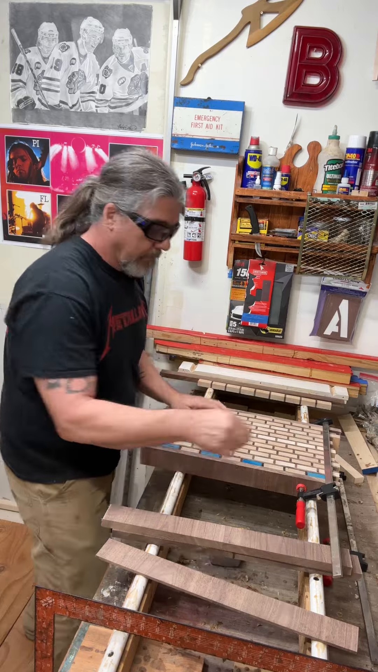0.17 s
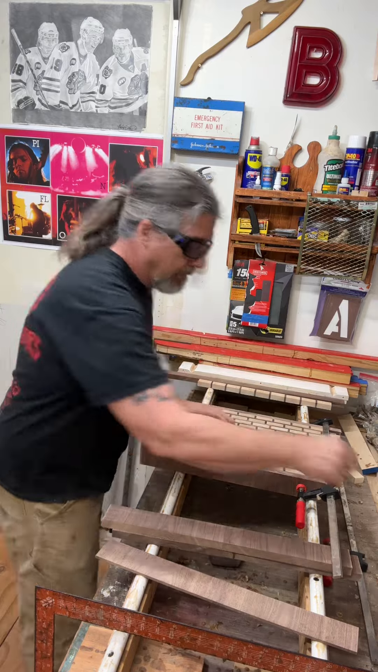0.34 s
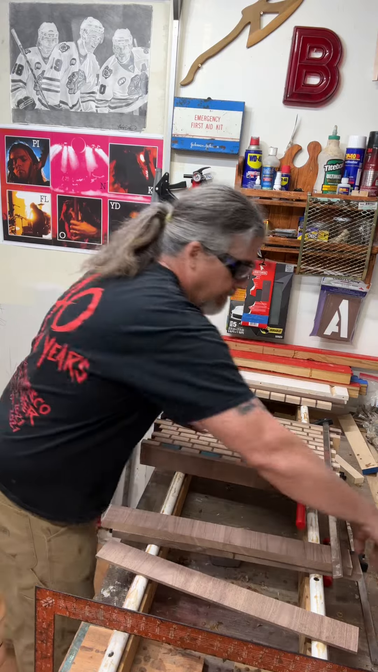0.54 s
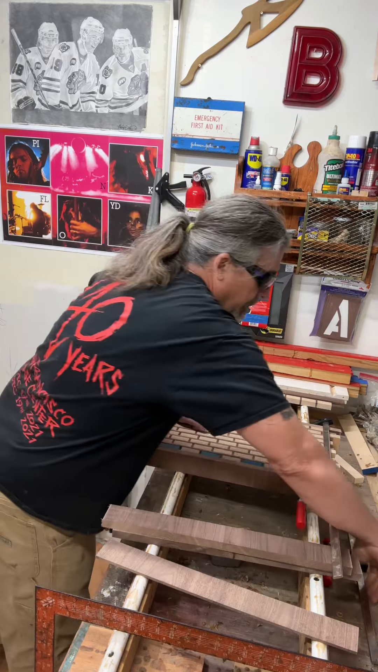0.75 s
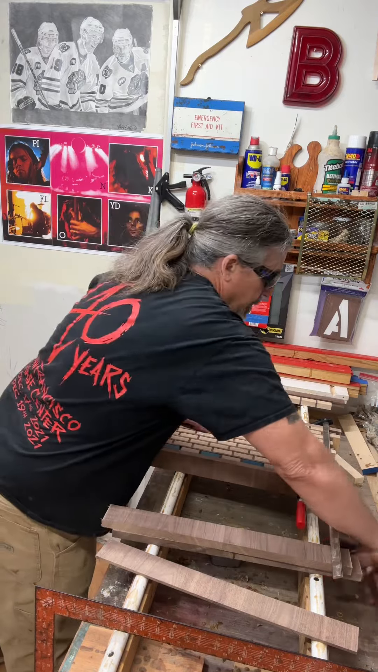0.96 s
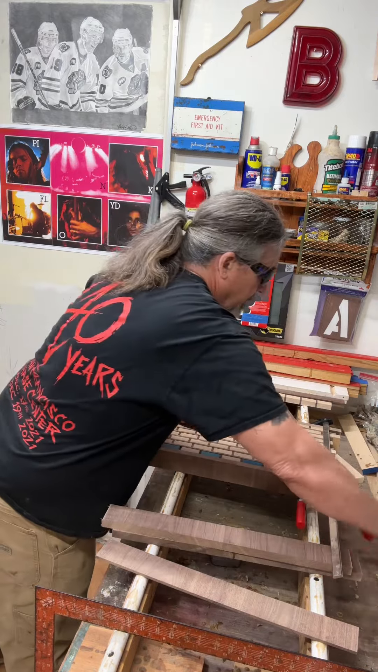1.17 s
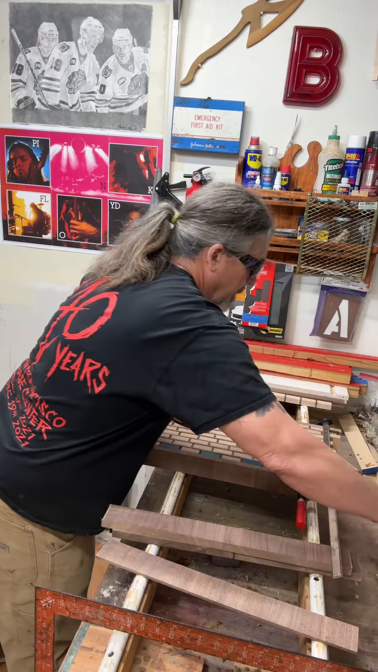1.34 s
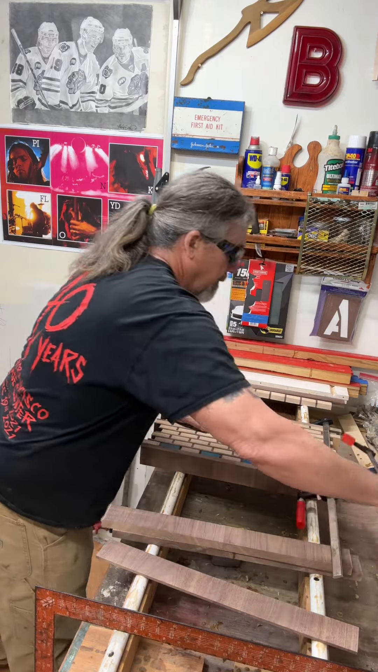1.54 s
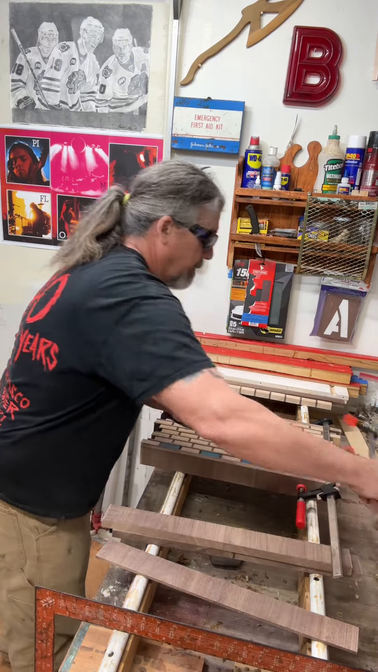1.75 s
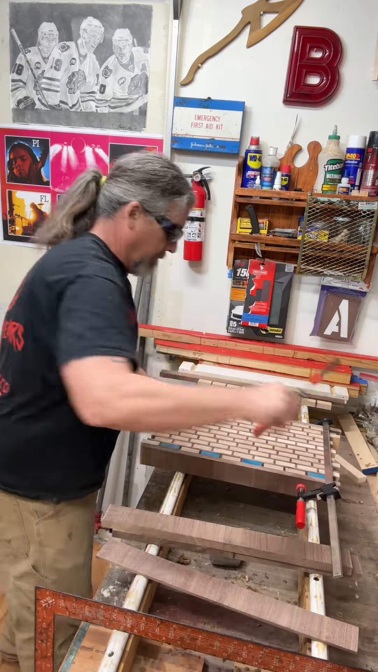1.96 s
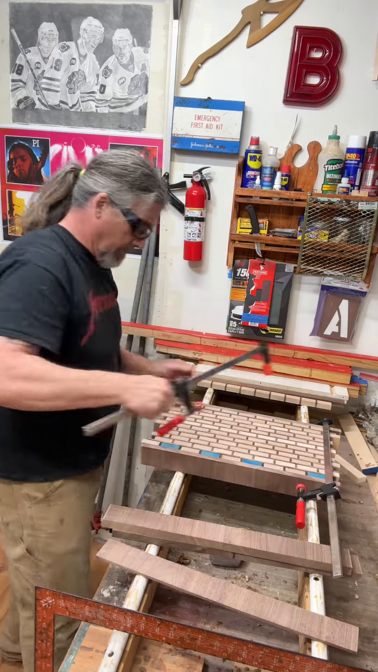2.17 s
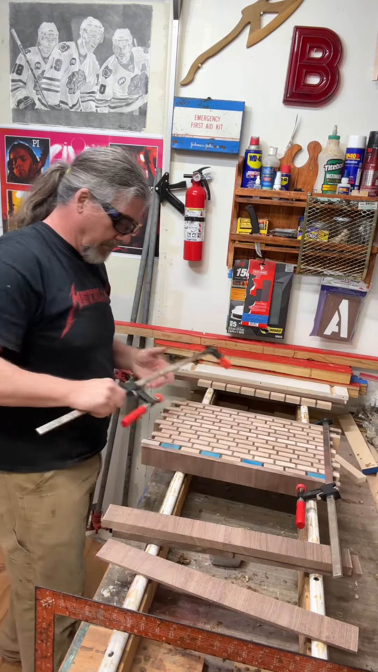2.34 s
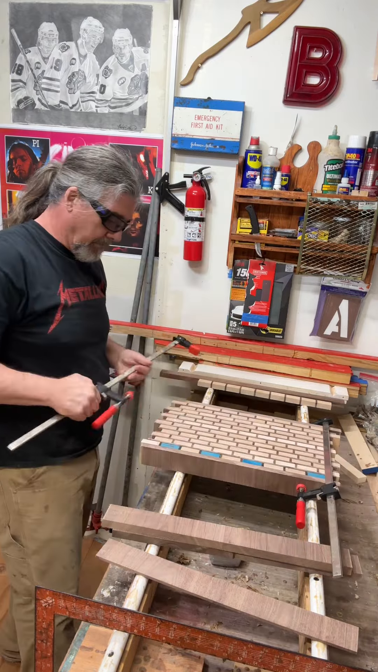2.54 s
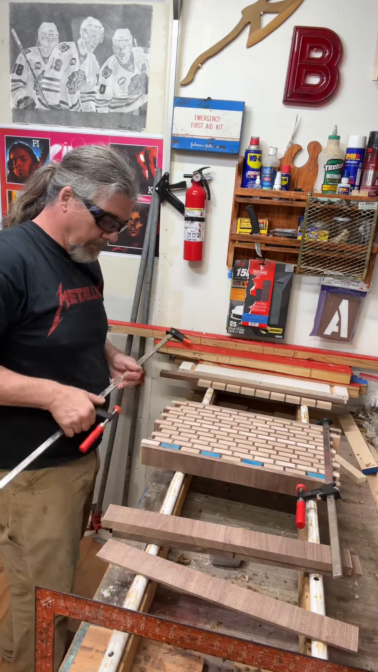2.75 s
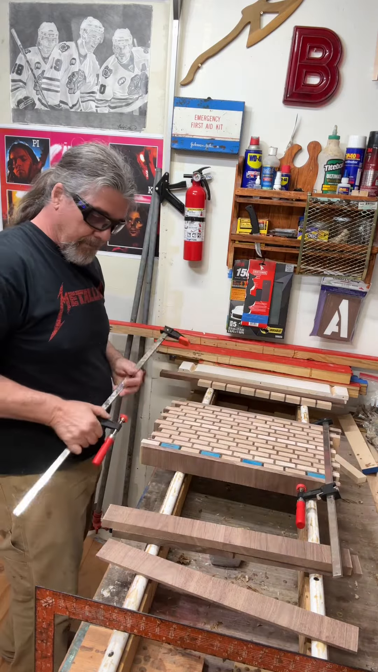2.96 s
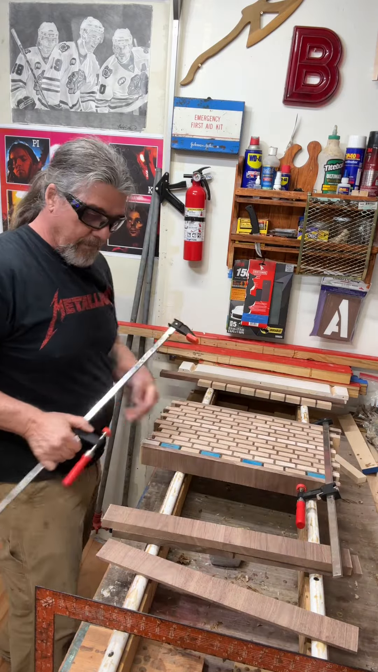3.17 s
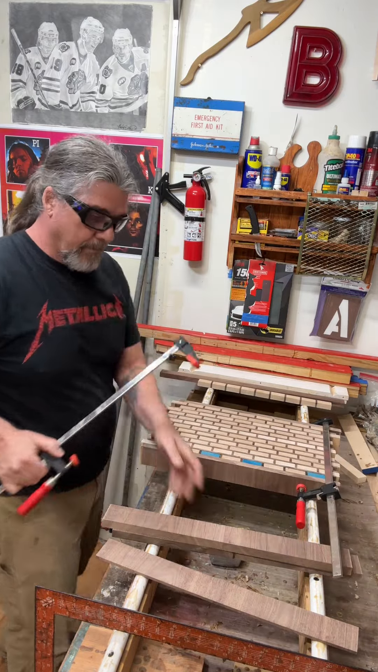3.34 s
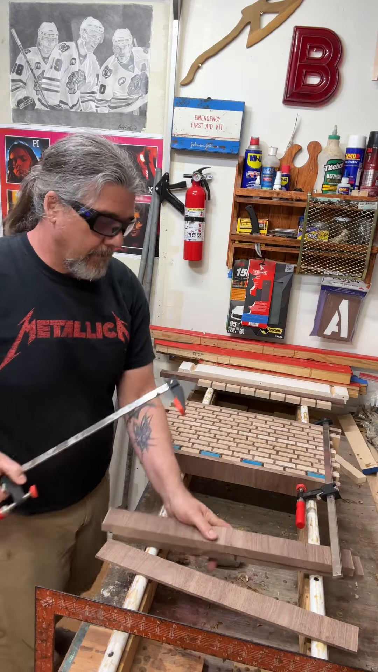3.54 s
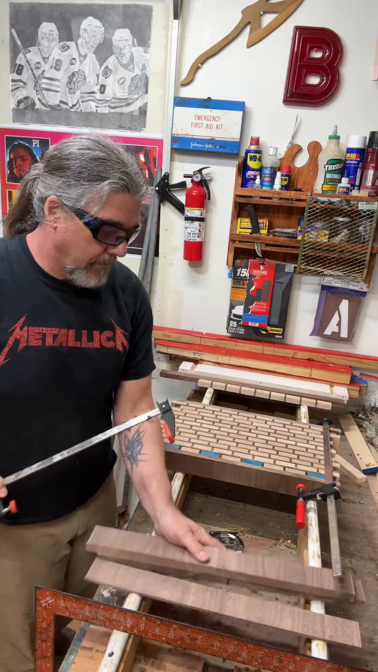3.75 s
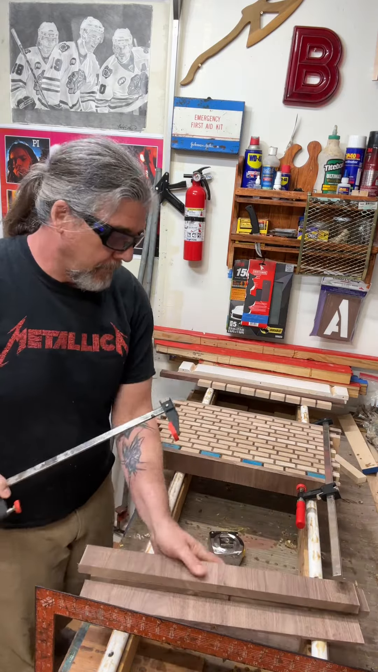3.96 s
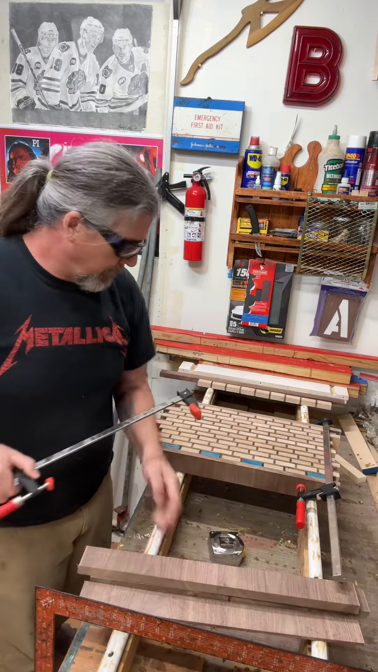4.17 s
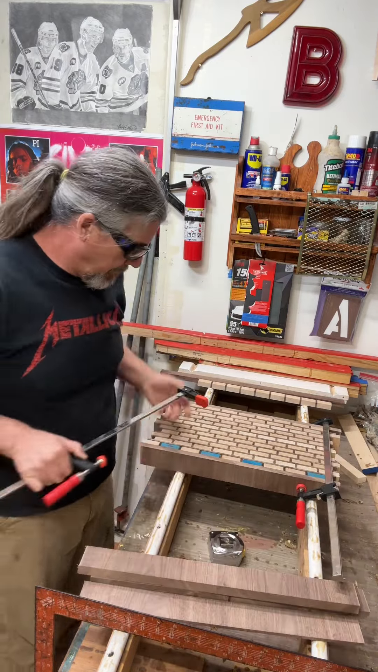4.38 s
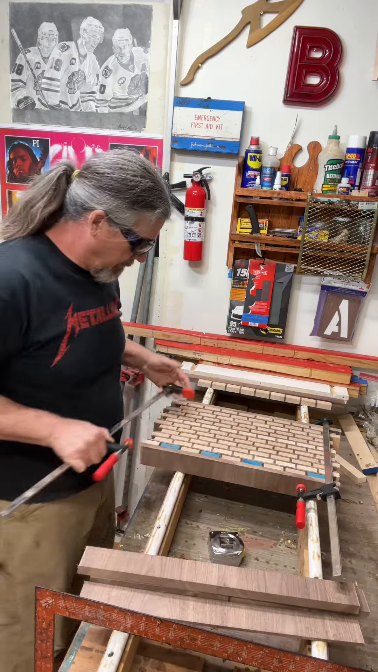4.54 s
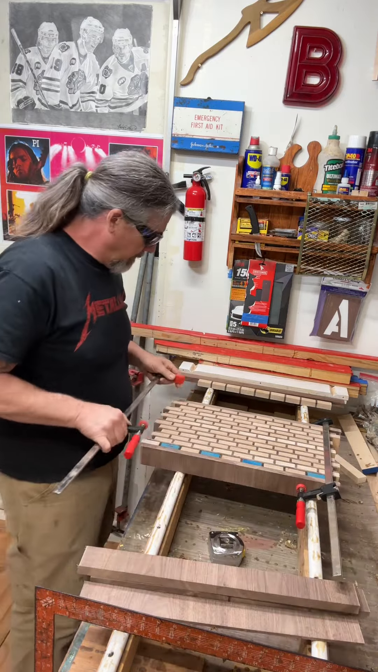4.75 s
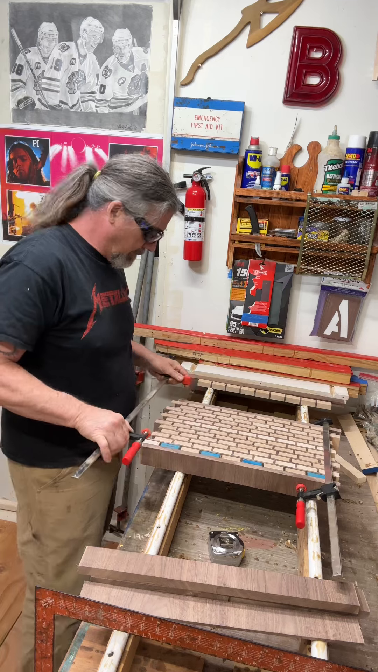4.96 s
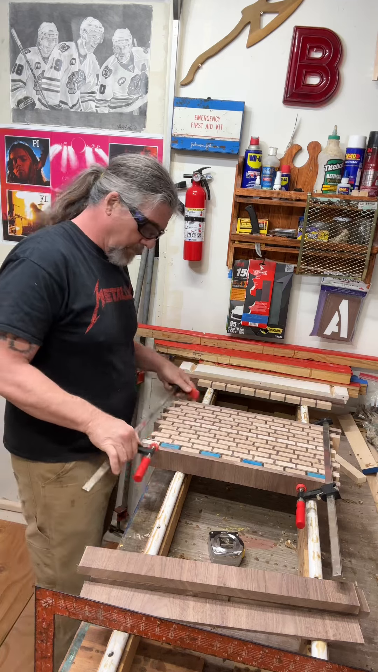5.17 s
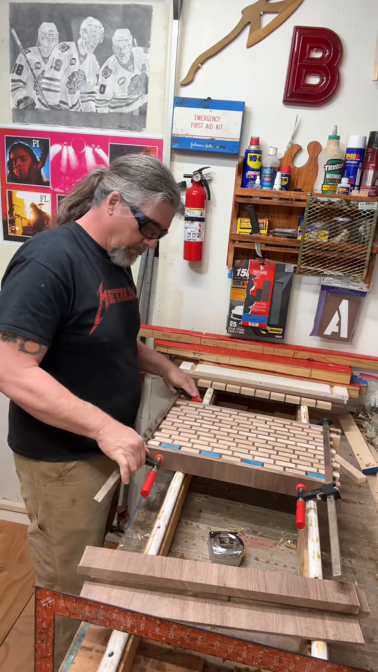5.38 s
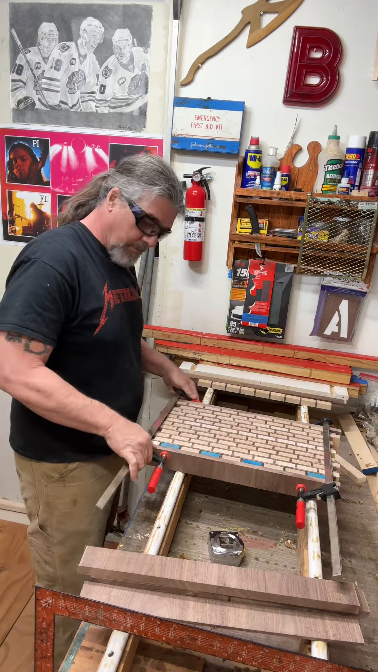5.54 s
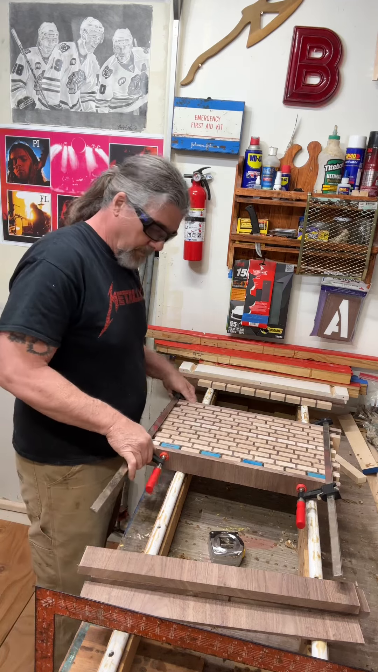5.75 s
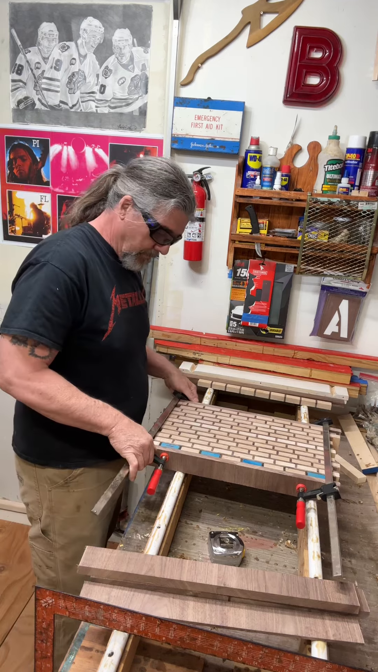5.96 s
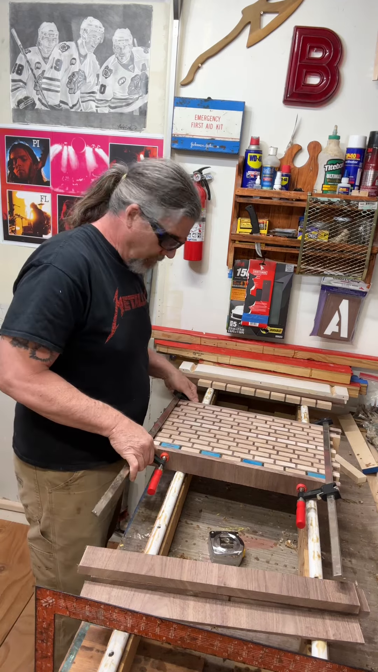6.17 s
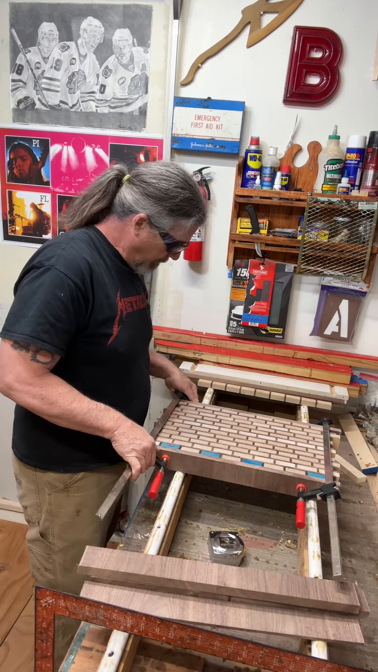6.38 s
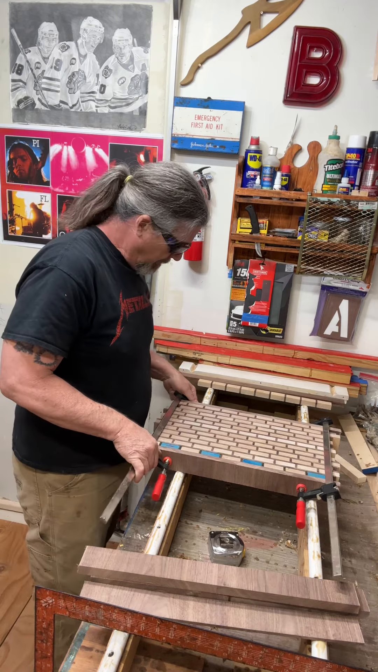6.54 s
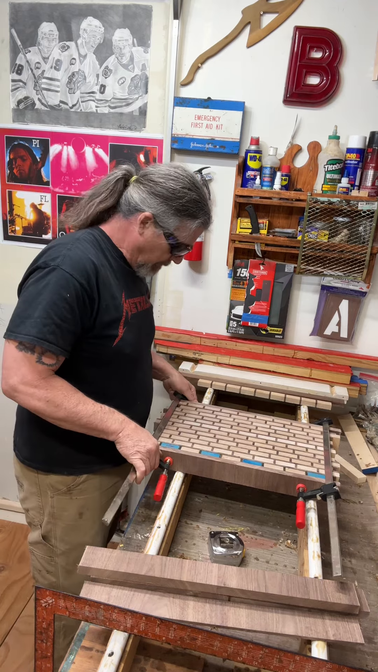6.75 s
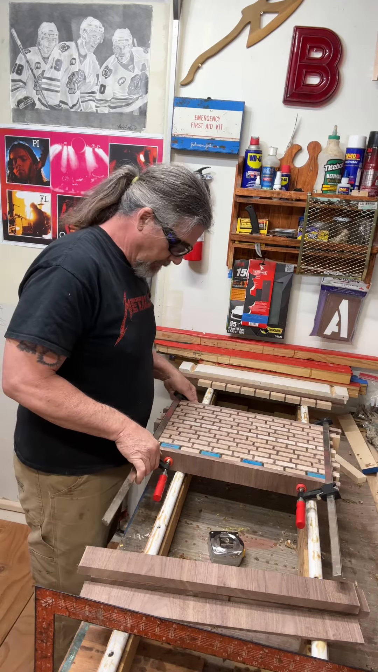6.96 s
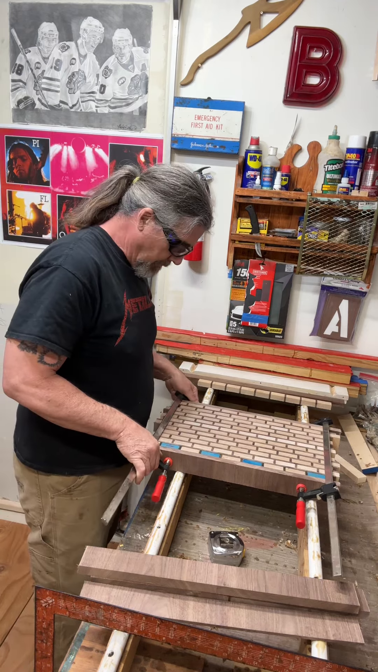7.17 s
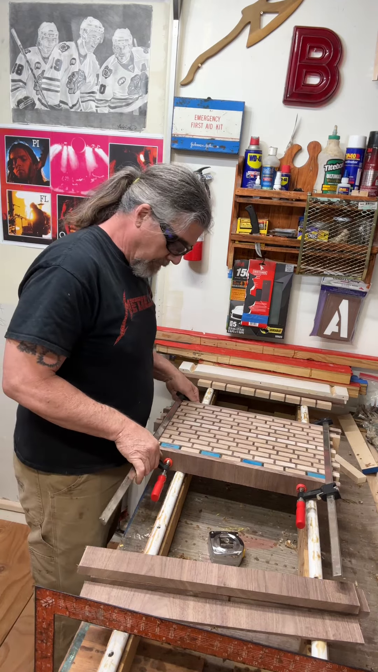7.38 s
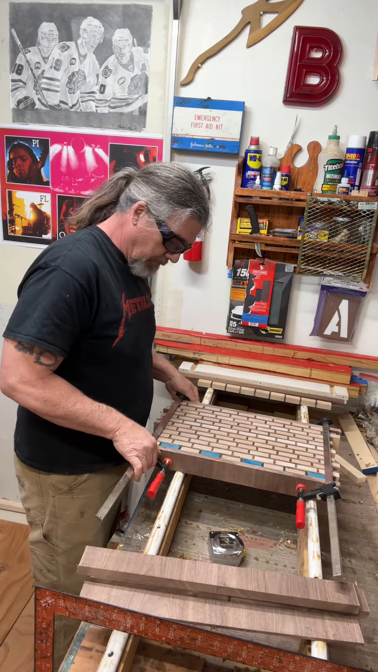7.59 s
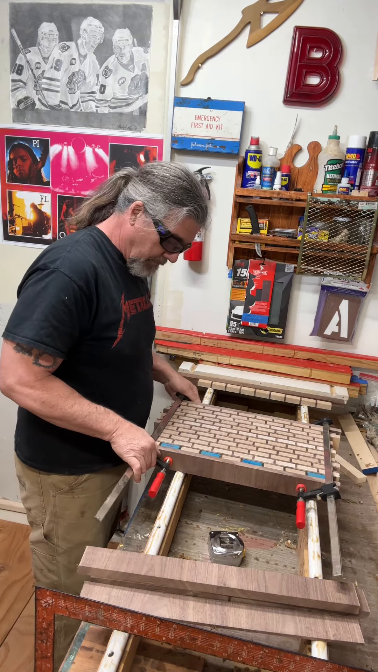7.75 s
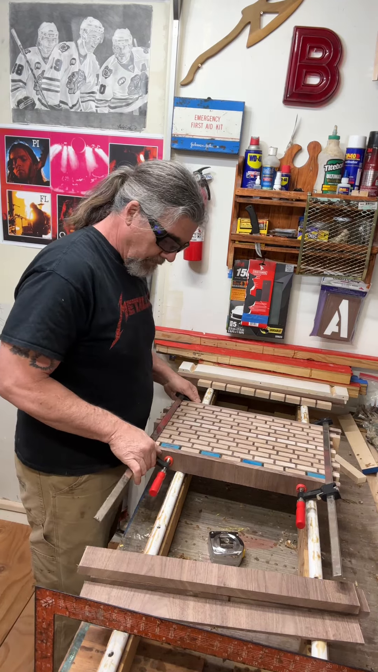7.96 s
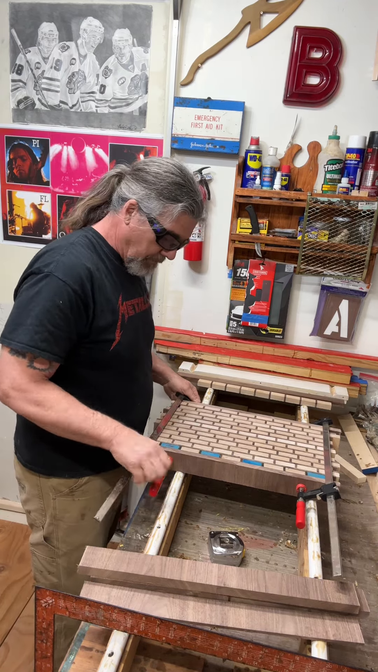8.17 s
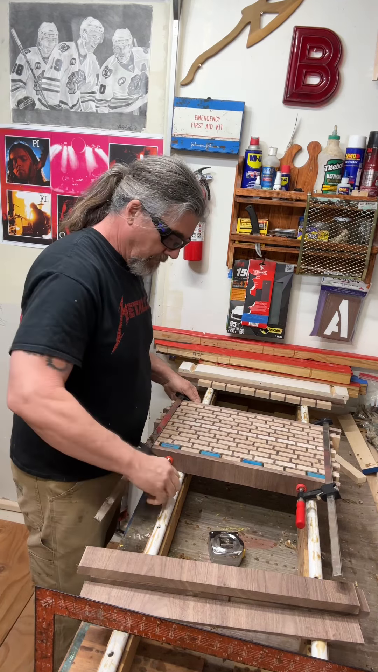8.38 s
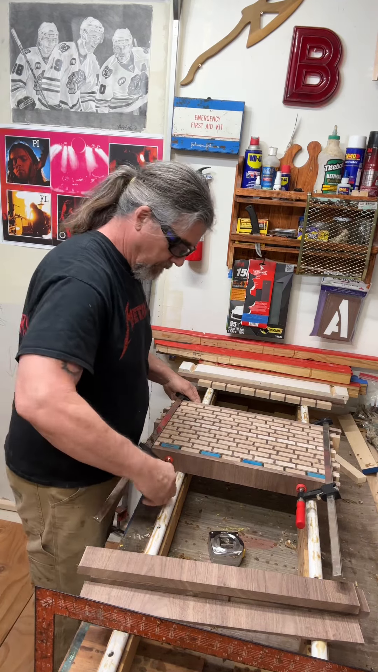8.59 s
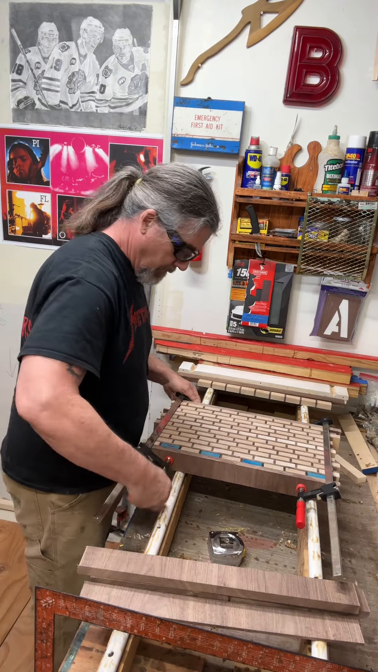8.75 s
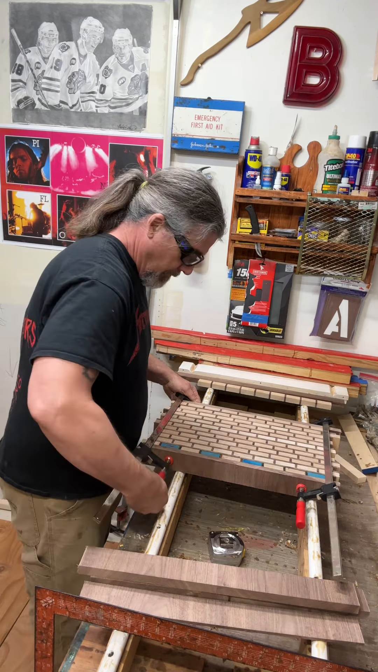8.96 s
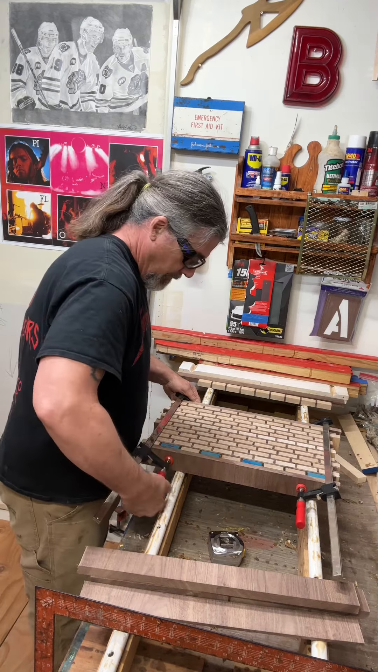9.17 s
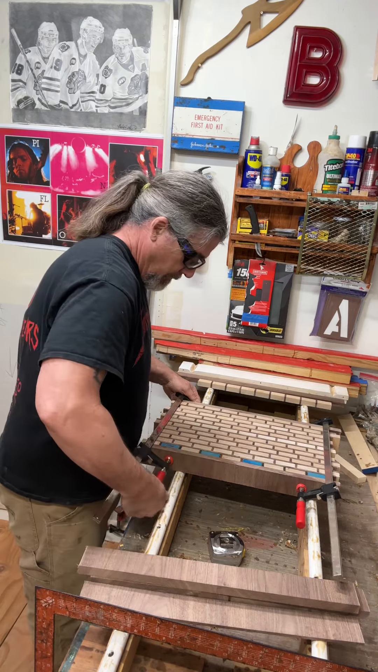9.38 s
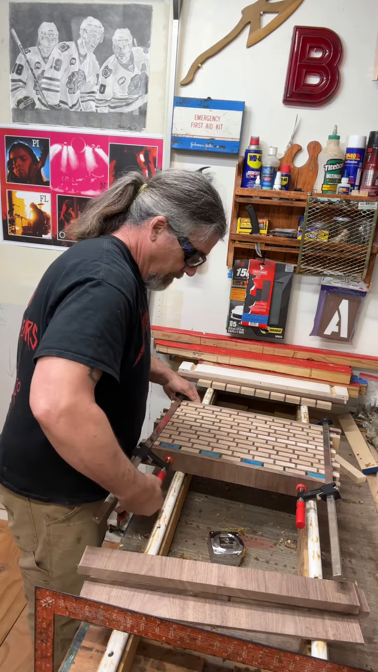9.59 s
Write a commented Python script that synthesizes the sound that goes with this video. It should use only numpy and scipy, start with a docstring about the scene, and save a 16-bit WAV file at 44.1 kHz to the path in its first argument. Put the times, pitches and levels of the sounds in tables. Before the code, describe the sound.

In a small woodshop, steel clamp parts clink and ratchet-scrape between wooden knocks and rubbing, before settling into faint bumps and a tiny screw squeak.

```python
"""Steel bar clamps clink and their jaws scrape along the bars in a small wood shop: forces excite resonant modes.
Wooden strips, later a glued stack, are knocked on the rack, driving strip, bench and floor modes.
Wood, skin and cloth rub as shaped noise, and a clamp screw squeaks faintly by stick-slip.
Room tails follow knocks, clinks, scrapes and brushes; bench and floor rumble and air noise lie beneath."""
import sys
import numpy as np
from scipy import signal
from scipy.fft import rfft, irfft, next_fast_len
from scipy.io import wavfile
from scipy.ndimage import map_coordinates

SR = 44100
rng = np.random.default_rng(int(sys.argv[2]) if len(sys.argv) > 2 else 0)


def master(y):
    """Save y as 16-bit WAV."""
    cut = np.clip(np.atleast_2d(y).T, -1, 1)
    pcm = np.round(cut * 32767)  # scale
    wavfile.write(sys.argv[1], SR, pcm.astype(np.int16))


N = 424241
SPAN = 2 ** 15  # samples in one contact's spectrum
HZ = np.fft.rfftfreq(SPAN, 1 / SR)
TOP_HZ = 15800
AIR_DB = -72.5
RISE_DB_PER_S, FALL_DB_PER_S = 219.5, 169  # every rubbing stroke swells and fades alike
WHISTLE_RISE_DB_PER_S = 2997.5
RISE_SHARE = 0.28  # a knock swells for this share of its decay time
PAN_SPREAD_DB = 7.5  # small contacts land a little left or right by chance

# Low rumble of bench and floor, swelling when bumped: time_s, level_db
RUMBLE_LEVEL = [(0, -59), (.24, -53), (.56, -60.5), (1, -46.5), (1.13, -53), (1.24, -58), (2.04, -60),
                (3.13, -61), (3.64, -51.5), (5.14, -62.5), (5.49, -60), (5.71, -49.5), (6.16, -57),
                (6.75, -59), (7.05, -62), (7.3, -60), (7.66, -53.5), (8.25, -59), (9.62, -54.5)]
# Relative noise spectra, rumble then air: frequency_hz, density_db
RUMBLE_SPECTRUM = [(15, -54), (25, -26.5), (37, -12), (60, 1), (103, -5), (115, -1.5), (129, -16),
                   (156, -15), (180, -16), (230, -46), (400, -120)]
AIR_SPECTRUM = [(88, -30), (150, -4.5), (296, -13), (473, -13.5), (597, -20.5), (711, -15.5), (1180, -29.5),
                (7630, -41.5), (10200, -40), (12700, -40.5), (15700, -58.5)]
# Likeness of the left and right ports: frequency_hz, correlation (no unit)
PORT_LIKENESS = [(40, .95), (130, .9), (260, .35), (600, .25), (3000, .35), (7000, .65), (13000, .7)]
# Strokes over the rack: start_s, hold_s, bench_rumble_db, wood_scrape_db, skin_cloth_hiss_db
RUB_STROKES = [(0.048, 0.061, -66, -58, -60.5), (0.165, 0.16, -57, -61.5, -69.5),
               (0.386, .18, -89, -77, -73.5), (0.7, 0.087, -67, -66.5, -69.5), (0.867, 0.13, -43, -58, -71),
               (1.123, 0.11, -50.5, -58.5, -66), (1.48, 0.071, -52, -52.5, -68),
               (1.788, 0.07, -75, -68, -68.5), (1.917, 0.14, -64, -68, -61.5),
               (2.15, 0.17, -68.5, -67.5, -68), (2.496, 0.19, -58, -52.5, -56.5),
               (2.837, 0.3, -74, -69.5, -78), (3.067, 0.2, -69.5, -56.5, -55),
               (3.58, 0.31, -47, -45.5, -51.5), (4.125, 0.18, -75, -74.5, -71.5),
               (4.448, 0.11, -61, -72, -73), (4.688, .12, -74.5, -73, -69.5),
               (4.961, 0.19, -61, -55.5, -55), (5.616, 0.024, -33.5, -63, -63),
               (5.72, 0.14, -60.5, -67.5, -70), (6.375, 0.19, -63.5, -77, -80.5),
               (6.68, 0.034, -54, -75, -88), (6.843, 0.048, -81, -77, -91), (7.366, 0.057, -58, -76, -88),
               (7.55, 0.088, -61, -74, -78), (7.726, 0.18, -61, -75, -89), (8.365, 0.087, -68, -90, -96),
               (8.62, 0.46, -64.5, -79.5, -86), (9.179, .44, -63, -81, -85.5)]
# Hands at rest, one row: bench_rumble_db, wood_scrape_db, skin_cloth_hiss_db
REST_LEVELS = (-75.5, -92, -94)
# Relative rubbing spectra, bench rumble, wood scrape, skin and cloth hiss: frequency_hz, density_db
GRIND_SPECTRUM = [(59, -24), (100, -2.5), (151, -10.5), (243, 3), (353, -7), (433, -4), (481, -8.5),
                  (700, -11.5), (910, -36.5), (1540, -120)]
SCRAPE_SPECTRUM = [(240, -32.5), (400, -3), (480, -8), (612, -7.5), (864, -8), (1450, -11.5), (1940, -13.5),
                   (4500, -32), (5850, -43.5), (9900, -120)]
HISS_SPECTRUM = [(1470, -25.5), (2500, -2.5), (3530, -4.5), (4420, -4.5), (10000, -11), (12900, -17),
                 (13800, -33.5), (15000, -54)]
# Narrow hiss as a strip glides on the rack, one row: start_s, hold_s, level_db
GLIDE_WHISTLE = (3.55, 0.317, -51.5)
# Relative spectrum of that hiss: frequency_hz, density_db
WHISTLE_SPECTRUM = [(8000, -57), (9100, -19), (9350, -9.5), (9600, -20.0), (11000, -62.0)]
# Hand or sleeve brushing past: start_s, strength_db, centre_hz, rise_s, hold_s
BRUSH_EVENTS = [(0.032, -51, 3950, 0.046, 0.019), (3.472, -59.5, 3260, 0.0089, 0.18),
                (4.121, -60, 8000, 0.011, 0.027), (4.413, -56.5, 4500, 0.032, 0.031),
                (4.594, -68, 5650, 0.024, 0.037), (6.397, -69, 2490, 0.093, 0.035),
                (6.817, -73, 2443, 0.022, 0.035), (7.802, -74, 4950, 0.022, 0.028),
                (7.924, -81.5, 5500, 0.0027, 0.011), (8.108, -77.5, 10000, 0.019, .02),
                (8.69, -74, 7000, 0.018, 0.026), (8.82, -81, 2490, 0.019, 0.048),
                (8.937, -80, 3000, 0.0209, 0.025), (9.248, -73.5, 2480, 0.029, 0.051),
                (9.344, -73, 1810, .01, 0.015), (9.564, -67.5, 4000, 0.056, .02)]
# Room decay: frequency_hz, t60_s
ROOM_DECAY = [(60, 0.55), (250, 0.32), (1000, 0.27), (6000, 0.34), (12000, 0.24)]
# Treble loss of the microphone on the contacts: frequency_hz, gain_db
MIC_RESPONSE = [(9000, -0.5), (12500, -3.5), (13800, -7), (14400, -23), (15800, -36)]
# Wood on wood: start_s, strength_db, floor_boom_db, bench_thud_db, treble_tick_db,
# hardness_db_per_octave, decay_s
KNOCK_EVENTS = [(0.175, -36.5, -27, -6, -6.5, -3.5, .022), (0.245, -36, -12, -4.5, -19.5, -14.5, .023),
                (0.674, -56, 12, 10.5, 2.5, -6, .014), (0.689, -50, -13, 4.5, -18, -3.5, .013),
                (0.867, -57.5, -2.5, 11.5, 4.5, -10, 0.023), (0.939, -56, 18.5, 21, -5, 5, .017),
                (1.01, -71, 15, 25, 6.5, -5, .011), (1.101, -62, 26, 5, -1, 2, 0.013),
                (1.189, -41.5, -14, -17.5, -16.5, -0.5, .004), (1.425, -34, -4, 3, -12.5, -2.5, .025),
                (1.582, -56, -7, -11, -2, -16, .016), (1.758, -75, 15.5, 23, 13.5, -11, .016),
                (3.195, -42, -6.5, -8, -2.5, -3.5, .022), (3.491, -54, 9.5, 13, -3, -4, .044),
                (3.55, -31.5, -34, -12, -13.5, 4.5, .013), (3.576, -40.5, -11, -5, -13, -5, .013),
                (4.407, -59, 0, 8, -9, -11, 0.031), (5.525, -28.5, -33.5, -18.5, 2.5, -3, .019),
                (5.594, -29, -13, -10.5, -17, 0, .013), (6.487, -43.5, 3, -6, -27.5, -1, .01),
                (6.518, -53, 9, -5, -17, -9, 0.0132), (6.642, -54.5, 6, -12, -28, -2.5, 0.01165),
                (6.683, -62.5, 3, 0, 3.5, 0, .007), (6.827, -64, 8, -2, -15, -8, 0.0152),
                (7.329, -52.5, 1, 1.5, -1.5, -4, .011), (7.507, -65.5, 10, 8, -5, 0, .014),
                (7.529, -60.5, 14.5, 5, 7, -7, .01), (7.651, -48, 2, 3, -23.5, 3, .012),
                (7.81, -68.5, 11, 1, -4.5, 8, 0.013), (7.928, -59, 13, 10, -26, -12, .015),
                (8.656, -61, 2, 5.5, -25.5, -7.5, 0.01314), (9.2, -67, 8, 21, -18, -0.5, .017),
                (9.248, -56, 12, 5.5, -18, -7.5, .021)]
# Modes of strips, glued stack, bench with rack, and floor boards: centre_hz, nominal_width_hz, level_db
STRIP_MODES = [(434, 430, -0.5), (650, 80, 0.5), (762, 70, 5.5), (1290, 82, 0), (1614, 110, -1.5),
               (2120, 130, -4), (2800, 170, -4.5), (4000, 300, -14)]
STACK_MODES = [(474, 91, -3.5), (773, 85, 3), (1340, 91, 3), (1720, 350, -5), (1970, 280, -3.5),
               (2770, 700, -15)]
BENCH_MODES = [(199.5, 35, 0.5), (250, 69, 1.5), (335, 49, -3.5), (370, 45, -11.5)]
FLOOR_MODES = [(42.4, 6, -12), (60, 17, -2.5), (88, 14, -2.5), (105, 14, -3.5)]
# Clamp parts clinking: start_s, strength_db, level_below_edge_db, decay_s
CLINK_EVENTS = [(0.7602, -64, -9, .003), (0.8165, -48.5, -2.5, 0.0049), (0.8375, -48, 0.5, 0.0034),
                (0.8704, -33.5, -23, 0.0031), (0.9457, -30, -10, 0.0023), (1.0081, -38, -11, .0015),
                (1.1932, -45.5, 1, 0.00073), (1.5848, -37, -5.5, 0.0056), (1.7549, -60.5, -19, 0.0072),
                (1.9485, -52.5, -3, 0.017), (2.0537, -52, 4.5, .0027), (2.1116, -47.5, -2.5, 0.00069),
                (2.1345, -32, -6, 0.0021), (2.4079, -50, -14, 0.004), (2.4174, -34.5, -9.5, 0.0048),
                (2.4394, -42.5, -14, 0.011), (2.4927, -38.5, -6, .002), (2.6319, -49, -6, 0.0024),
                (2.7467, -56.5, 3.5, .0019), (2.834, -59.5, 3, .0033), (2.9447, -58, -3, 0.0038),
                (2.9607, -49.5, -0.5, 0.0054), (4.7626, -43.5, -11, 0.0073), (5.0206, -29, -8.5, .003),
                (5.526, -26, 4.5, .006)]
# Jaw running along the bar: start_s, strength_db, level_below_edge_db, ring_over_scrape_db,
# brightness_db_per_octave (approached well above 4 kHz), rise_s, hold_s, pan_db (left over right), room_db
SLIDE_EVENTS = [(1.42, -27, -34, -2, 2.5, 0.017, 0.016, 2.5, -2.5),
                (4.808, -24, -2, 4.5, -7, 0.015, .035, 3.5, 3),
                (4.925, -34.5, 0.5, -5.5, -3.5, 0.02, 0.014, 0.5, -4),
                (5.0, -37, -13, -6.5, 0, 0.0073, .015, -2, -2),
                (5.45, -24.5, -10.5, -1, 3, 0.032, .025, 3.5, 1),
                (5.497, -26, -11.5, 2, 1, 0.02, .015, -2, 4),
                (5.557, -34, -15, -2.5, 3.5, 0.005, .04, 0.5, -0.5),
                (5.914, -63.5, -14.5, -3, -9.5, .004, .02, -3, 0.5)]
# Modes of loose clamp parts, then clamp bar: centre_hz, nominal_width_hz, level_db
PART_MODES = [(1960, 90, -5), (2990, 90, -13.5), (4040, 120, -18), (4980, 90, 12), (5550, 430, 0.5),
              (6100, 147, -3.5), (7340, 150, -17.5), (8300, 120, 3.5), (8650, 130, 5.5), (9500, 150, -13.5),
              (11600, 200, -10)]
BAR_MODES = [(810, 30, -19), (1236, 40, -3), (1400, 40, -15), (2510, 42, -6), (2990, 50, -8.5),
             (3260, 96, 0), (3350, 100, -8), (4000, 40, -18.5), (4450, 50, -13), (4870, 60, -6.5),
             (5300, 68, -6), (5770, 40, -9.5), (6045, 50, -10), (6610, 50, -8), (6740, 50, -9.5),
             (8350, 60, -11.5), (8900, 80, -11), (9730, 120, -8.5), (10500, 90, -2), (11600, 90, -6),
             (12980, 90, -8.5)]
# Clamp screw, one table a turn: time_s, mean_slip_rate_hz, level_db
SCREW_TURNS = [
    [(6.27, 4250, -105), (6.32, 4330, -93), (6.38, 4230, -100), (6.42, 4270, -89), (6.46, 4300, -92),
     (6.48, 4300, -105)],
    [(9.05, 2560, -100), (9.12, 2780, -90), (9.15, 2680, -102), (9.21, 2600, -82), (9.28, 2540, -83),
     (9.34, 2390, -89), (9.44, 2440, -88), (9.53, 2650, -88), (9.62, 2660, -86)],
]
# Radiation of the screw: frequency_hz, gain_db
SCREW_RADIATION = [(2000, -20), (5000, -12), (7800, -3), (9000, 0), (10800, 0), (12500, -25), (22000, -60)]


def amp(db):
    """Amplitude ratio from decibels, on the 20 log scale."""
    return 10 ** (np.asarray(db) / 20)


def unit(x):
    """Normalisation to unit root mean square."""
    return x / np.sqrt(np.mean(np.abs(x) ** 2) + 1e-20)


def along(points, hz):
    """Interpolation of a spectrum on a logarithmic frequency axis."""
    f, v = np.transpose(points)
    return np.interp(np.log(hz + 1), np.log(f + 1), v)


def curves(rows, quiet=None):
    """Linear interpolation in time of each column after the first."""
    s, *columns = np.transpose(rows)
    time_s = np.arange(N) / SR
    return [np.interp(time_s, s, column, quiet, quiet) for column in columns]


def wobble(rate_hz):
    """Smooth random modulation: a spline through independent Gaussian knots."""
    knots = rng.standard_normal(int(N * rate_hz / SR) + 4)
    return map_coordinates(knots, [np.arange(N) * rate_hz / SR])


def filtered(x, response):
    """Linear filtering by multiplication in the frequency domain."""
    size = next_fast_len(N + 8192)
    hz = np.fft.rfftfreq(size, 1 / SR)
    return irfft(rfft(x, size) * response(hz), size)[..., :N]


def ports(z, hz):
    """Partial coherence: mid and side shares of unrelated spectra set the left-right correlation."""
    turn = np.arccos(np.clip(along(PORT_LIKENESS, hz), -1, 1)) / 2
    mid, side = z[0] * np.cos(turn), z[1] * np.sin(turn)
    return np.array([mid + side, mid - side])


def rush(spectrum, grain_db):
    """Filtered noise of rms 1 whose random amplitude modulation gives a rough grain."""
    grain = amp(grain_db * (wobble(40) + wobble(300)))
    pair = rng.standard_normal((2, N)) * grain
    size = next_fast_len(N + 8192)
    hz = np.fft.rfftfreq(size, 1 / SR)
    coloured = ports(rfft(pair, size), hz) * amp(along(spectrum, hz))
    return unit(irfft(coloured, size)[:, :N])


def shop():
    """Shaped noise: low rumble of bench and floor, swelling when bumped, with still air and microphone hiss."""
    level_db, = curves(RUMBLE_LEVEL)
    rumble = amp(level_db + 0.85 * wobble(8.3)) * rush(RUMBLE_SPECTRUM, grain_db=0.5)
    return rumble + amp(AIR_DB) * rush(AIR_SPECTRUM, grain_db=0.5)


def strokes(rows, rise_db_per_s, fall_db_per_s):
    """Power addition of strokes with exponential swell, hold and exponential fade."""
    s, hold, *levels = np.transpose(rows)
    t = np.arange(0, N + 64, 64)[:, None] / SR  # gain is computed every 64 samples
    shape_db = -rise_db_per_s * np.maximum(s - t, 0)
    shape_db = shape_db - fall_db_per_s * np.maximum(t - s - hold, 0)
    time_s = np.arange(N) / SR
    return [np.interp(time_s, t[:, 0], np.linalg.norm(amp(shape_db + db), axis=1)) for db in levels]


def rubbing():
    """Friction noise: wood, skin and cloth strokes modulate spectrally shaped noise over a resting level."""
    gains = strokes(RUB_STROKES, RISE_DB_PER_S, FALL_DB_PER_S)
    grind, scrape, hiss = (np.hypot(gain, amp(db)) for gain, db in zip(gains, REST_LEVELS))
    whistle, = strokes([GLIDE_WHISTLE], WHISTLE_RISE_DB_PER_S, FALL_DB_PER_S)
    out = grind * rush(GRIND_SPECTRUM, grain_db=2.5)
    out = out + scrape * rush(SCRAPE_SPECTRUM, grain_db=1.0)
    out = out + hiss * rush(HISS_SPECTRUM, grain_db=1.0)
    return out + whistle * rush(WHISTLE_SPECTRUM, grain_db=3.0)


def band(low_hz, high_hz):
    """Causal band-pass: second-order slopes below and above a broad contact band."""
    up, down = 1j * HZ / low_hz, 1j * HZ / high_hz
    return unit((up / (1 + up)) ** 2 / (1 + down) ** 2)


def contact(rise, hold, fall, grain_db):
    """Random contact force of unit energy: linear rise, hold and exponential release."""
    t = np.arange(SPAN // 4) / SR
    swell = np.minimum(t / max(rise, 1e-4), 1)
    shape = swell * np.exp(-np.maximum(t - rise - hold, 0) / max(fall, 1e-4))
    grain = amp(grain_db * np.repeat(rng.standard_normal(len(t) // 32), 32))
    force = shape * rng.standard_normal(len(t)) * grain
    return rfft(force / np.linalg.norm(force), SPAN), np.sum(shape ** 2)


def add(out, s, sound, pan_db, lag_ms, room_db):
    """Direct sound plus diffuse reverberation: level and delay place it, noise bands decay by their t60."""
    hz, t, noise = signal.stft(rng.standard_normal((2, SPAN // 4 * 3)), SR, nperseg=256)
    decay = amp(-60 * t / along(ROOM_DECAY, hz)[:, None])
    tail = signal.istft(noise * decay, SR, nperseg=256)[1]
    tail = ports(rfft(tail / np.linalg.norm(tail[0]), SPAN), HZ)
    tail = tail * np.exp(-2j * np.pi * HZ * 0.004)  # 4 ms delay
    side = np.array([[.5], [-.5]])  # left, right
    direct = amp(side * pan_db) * np.exp(-2j * np.pi * HZ * (side * lag_ms + .5) / 1000)
    first = round(s * SR) - SR // 2000  # offsets the half millisecond in the direct path
    heard = irfft(sound * (direct + amp(room_db) * tail), SPAN)[:, :SPAN // 8 * 7]
    out[:, first:first + heard.shape[1]] += heard


def brushes():
    """Soft friction swishes: a smoothly swelling noise force passes a broad band."""
    out = np.zeros((2, N + SPAN))
    for s, db, hz, rise, hold in BRUSH_EVENTS:
        force, time = contact(rise, hold, 0.013, grain_db=0.0)
        colour = unit(band(0.31 * hz, 1.6 * hz) ** 2)
        add(out, s, amp(db) * np.sqrt(time) * force * colour, 0, -.1, room_db=-6.5)
    return out[:, :N]


def body(modes, scatter_db):
    """Modal superposition: causal resonances whose strengths vary at random from contact to contact."""
    centre, width, db = np.transpose(modes)[:, :, None]
    width = np.maximum(width, 8 + centre / 70)  # least damping of any mode
    sign = (-1.) ** np.arange(len(centre))[:, None]
    gain = amp(db + scatter_db * rng.standard_normal(db.shape)) * sign
    damping = 1j * HZ * width
    return unit(np.sum(gain * damping / (centre * centre - HZ * HZ + damping), axis=0))


def soft(hz):
    """Contact compliance as a causal second-order low-pass: a yielding contact weakens the treble."""
    return 1 / (1 + 1j * HZ / hz) ** 2


def wood():
    """Impact excitation: a knock rings wood, shoves bench and floor modes and ticks at the contact."""
    out = np.zeros((2, N + SPAN))
    for s, db, boom_db, thud_db, tick_db, hard_db, fall in KNOCK_EVENTS:
        rise = RISE_SHARE * fall
        force, time = contact(rise, 0, fall, grain_db=4.5)
        scratch = contact(.0008, 0, fall, grain_db=2.0)[0]
        snap = np.exp(-2j * np.pi * HZ * rise)  # the blow lands at the top of the rise
        push = np.exp(-2j * np.pi * HZ * (rise + .4 * fall))  # heavy parts feel one late shove
        modes = STRIP_MODES if s < 6 else STACK_MODES
        # harder blows favour higher modes
        modes = [(hz, width, level + hard_db * np.log2(hz / 800)) for hz, width, level in modes]
        ring = (0.5 * snap + 0.68 * force) * body(modes, scatter_db=0.5)
        ring = ring * soft(hz=5500 * amp(1.2 * hard_db)) ** 2
        tick = amp(tick_db) * scratch * band(low_hz=2210, high_hz=6000) * soft(hz=11100)
        late = np.exp(-2j * np.pi * HZ * 0.016)  # the floor answers after the bench
        deep = amp(thud_db) * body(BENCH_MODES, scatter_db=4.0)
        deep = deep + amp(boom_db) * late * body(FLOOR_MODES, scatter_db=2.0)
        deep = (0.74 * push + .6 * force) * deep * soft(hz=895.2)
        sound = amp(db) * np.sqrt(time + 200) * (ring + tick + deep)
        pan_db = PAN_SPREAD_DB * rng.standard_normal()
        add(out, s - rise / 2, sound, pan_db, -.1, room_db=3.0)
    return out[:, :N]


def steel(modes, blow, grit, ring_db, low_db, edge_hz, scatter_db):
    """Modal ringing plus a broad crack, with weak radiation from small parts below an edge frequency."""
    u = 1j * HZ / edge_hz
    cube = 1 + 2 * u + 2 * u ** 2 + u ** 3
    crack = grit * band(low_hz=940, high_hz=11600)
    ring = amp(ring_db) * blow * body(modes, scatter_db)
    return (ring + crack) * (u ** 3 + amp(low_db)) / cube


def clamp():
    """Impact and friction excitation: loose parts clink, and the sliding jaw keeps the bar ringing."""
    out = np.zeros((2, N + SPAN))
    # the lag changes sign as the clamp is carried from one side of the rack to the other
    early_lag_ms, later_lag_ms = -.17, .125
    for s, db, low_db, fall in CLINK_EVENTS:
        force, time = contact(0.00035, 0, fall, grain_db=5.5)
        blow = 1 + amp(2.5) * force  # one sharp snap, then chatter
        colour = steel(PART_MODES, force, blow, ring_db=1.5, low_db=low_db, edge_hz=4500, scatter_db=3.5)
        pan_db = PAN_SPREAD_DB * rng.standard_normal()
        lag_ms = early_lag_ms if s < 4 else later_lag_ms
        add(out, s, amp(db) * np.sqrt(time + 60) * colour, pan_db, lag_ms, room_db=-1.0)
    for s, db, low_db, ring_db, bright_db, rise, hold, pan_db, room_db in SLIDE_EVENTS:
        force, time = contact(rise, hold, .012, grain_db=3.0)
        grit = contact(rise, hold, 0.011, grain_db=5.0)[0]
        colour = steel(BAR_MODES, force, grit, ring_db, low_db, edge_hz=2500, scatter_db=5.0)
        colour = colour * amp(bright_db * np.log2(1 + HZ / 4000))
        lag_ms = early_lag_ms if s < 4 else later_lag_ms
        add(out, s, amp(db) * np.sqrt(time) * colour, pan_db, lag_ms, room_db)
    return out[:, :N]


def screw():
    """Stick-slip as a harmonic series: a wavering slip rate with separately fluctuating partials."""
    out = np.zeros(N)
    waver = 1 + .008 * wobble(40) + .008 * wobble(500)
    catch_db = [6 * wobble(22) for k in range(4)]
    for turn in SCREW_TURNS:
        hz = curves(turn)[0] * waver
        level_db = curves(turn, quiet=-150)[1]
        phase = 2 * np.pi * np.cumsum(hz) / SR
        for k, partial_db in enumerate(catch_db, start=1):
            gain = amp(level_db + along(SCREW_RADIATION, k * hz) + partial_db)
            out = out + gain * np.sin(k * phase)
    return out


def scene():
    """Linear superposition of all sources at the two microphone ports."""
    contacts = filtered(clamp() + wood() + brushes(), lambda hz: amp(along(MIC_RESPONSE, hz)))
    return contacts + rubbing() + screw() + shop()


def record(dry):
    """Band limitation: nothing is passed from the top frequency upward."""
    return filtered(dry, lambda hz: hz < TOP_HZ)


dry = scene()
out = record(dry)
master(out)
```